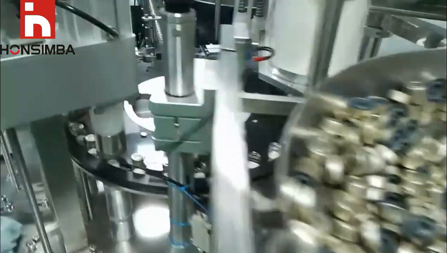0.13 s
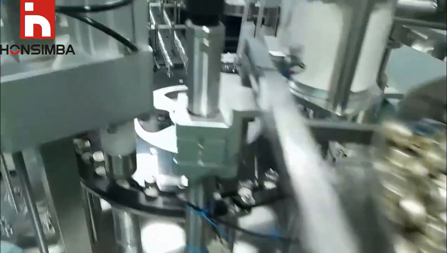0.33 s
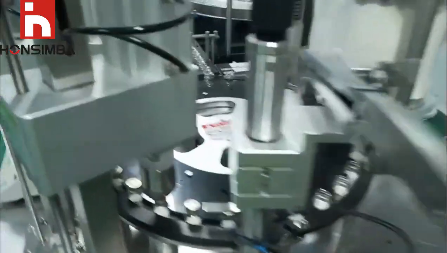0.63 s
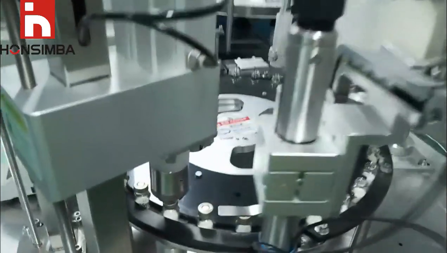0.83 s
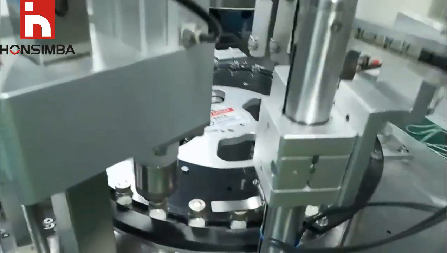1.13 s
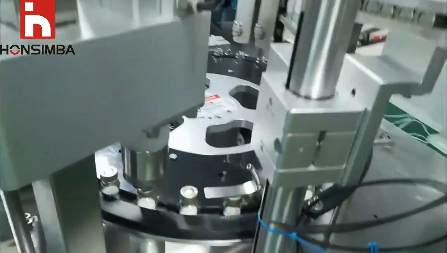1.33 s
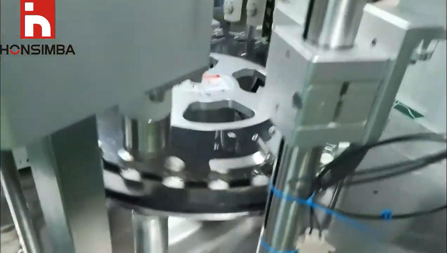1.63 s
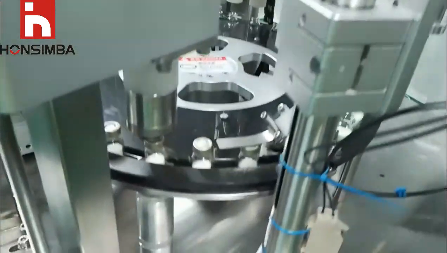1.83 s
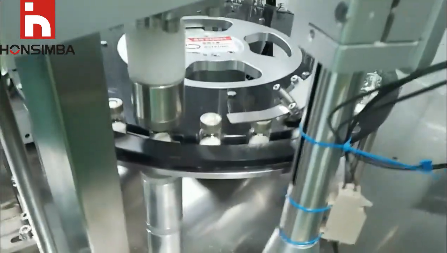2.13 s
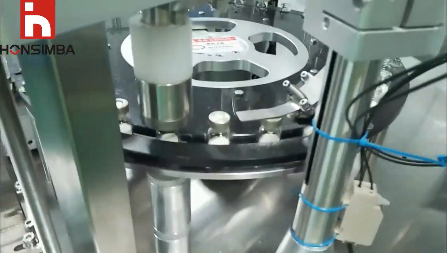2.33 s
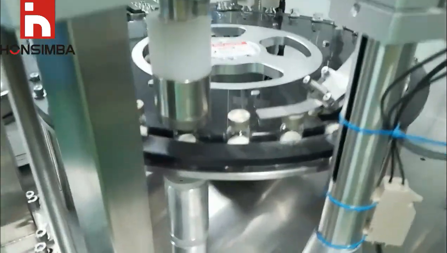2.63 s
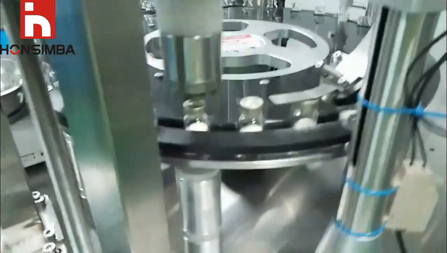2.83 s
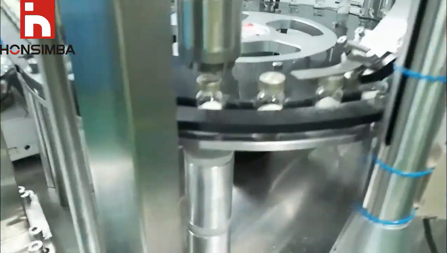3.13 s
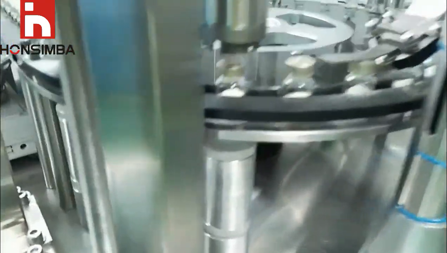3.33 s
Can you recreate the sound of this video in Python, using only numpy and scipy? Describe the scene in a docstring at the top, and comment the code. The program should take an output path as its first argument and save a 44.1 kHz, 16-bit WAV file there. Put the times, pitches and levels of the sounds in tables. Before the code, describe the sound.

Close up in a humming factory, a capping machine hisses air twice in long blasts, each followed by crisp puffs and ringing knocks on steel. Small parts clink while metal caps chatter steadily in a feeder bowl.

```python
"""A vial capping machine, close up and in mono, over factory ventilation and mains hum.
It opens on a blast of air, with metal caps chattering throughout in a vibrating feeder bowl.
Short puffs follow, the mechanism knocks the steel frame, and from 1.5 s small steel parts clink.
At 2.1 s the valve opens with a rush into a second long blast, and the chatter swells.
Spits, clinks, puffs and a run of ringing knocks close the cycle."""
import sys
import numpy as np
from scipy import signal
from scipy.fft import rfft, irfft
from scipy.io import wavfile
from scipy.ndimage import uniform_filter1d, map_coordinates

SR = 44100
rng = np.random.default_rng(int(sys.argv[2]) if len(sys.argv) > 2 else 0)


def materialize(psi):
    """Save the field psi as 16-bit PCM at rate SR to the path in sys.argv[1].

    A 1-D psi becomes a single channel; in a 2-D psi each row is a channel.
    """
    bounded = np.clip(np.atleast_2d(psi).T, -1, 1)
    quanta = np.round(bounded * 32767).astype(np.int16)
    wavfile.write(sys.argv[1], SR, quanta)


N = 154350

# Tone colours of the noise layers. Each row: frequency in Hz, relative level per Hz in dB.
HALL_EQ = [(25, -34), (55, -22), (80, -26), (125, -19), (165, -26), (195, -13), (235, -8.5), (285, 0),
           (340, -2.5), (500, -5.5), (660, -2), (900, -5.5), (1400, -3), (2000, -15.5), (3000, -38)]  # low ventilation wash
FEEDER_EQ = [(1200, -9.5), (1750, -3.5), (2400, -1), (3000, -3.5), (3500, -4), (4400, -4), (5400, -3.5),
             (6500, 3), (7400, 0), (8300, 4.5), (9300, -2), (10300, -7.5), (11500, -8), (13600, -9.5)]  # bright rattle of caps
CRACK_EQ = [(2000, -10), (4000, -2), (5500, 3.5), (8300, 10.5), (10000, -3.5), (14000, -7)]  # sharp edge of a clink
KNOCK_EQ = [(40, -23), (110, -6.5), (175, -18), (260, 3.5), (450, -1), (680, 6.5), (900, -4.5), (2500, -31),
            (6000, -12)]  # dull body of a knock
CLACK_EQ = [(700, 2), (1200, -6), (2500, 1), (5000, -15), (9000, -20)]  # hard top of a knock
PUFF_EQ = [(1500, -28), (2500, -19), (4500, 9), (6400, 14), (7400, 15), (8300, 17), (9300, 10.5),
           (10300, 12), (11200, -12), (14000, 1)]  # crisp puff of air
SPIT_EQ = [(1500, -16), (2400, 2), (5000, -14), (9000, -21), (10300, 0.5), (11500, 2), (13500, -7.5)]  # thin spit of air
RUSH_EQ = [(200, -16), (700, -5), (1100, -12), (2000, -1), (3800, 2), (6000, 1), (14000, -5.5)]  # broad rush of the opening valve
BLAST_EQ = [(1000, -19), (1700, -20.5), (2200, -10), (2950, -17), (3500, -9), (4400, -13), (5600, -6),
            (6300, -0.5), (6800, 1.5), (7500, -3), (8300, 2.5), (9000, -3), (10000, -8.5), (12500, -12.5),
            (13700, -9)]  # hissing jet

# Hum and whine of motors and vibrators. Each row: frequency in Hz, level in dB.
MOTOR_TONES = [(100, -66), (200, -69.5), (2553, -52), (6454, -58)]
# Fader curve of the cap chatter. Each row: time in seconds, level in dB.
FEEDER_FADER = [(0, -27.5), (.62, -26.5), (.72, -27), (.82, -25), (.9, -28), (1.08, -27), (1.28, -27.5),
                (1.43, -27.5), (1.58, -26), (1.78, -26.5), (1.86, -28), (2.0, -31), (2.15, -21.5),
                (2.95, -25.5), (3.08, -26.5), (3.18, -25.5), (3.34, -28.5), (3.5, -26.5)]

# Resonances of struck steel. Each row: frequency in Hz, relative level in dB, t60 in seconds.
SMALL_PART_MODES = [(4040, -8, 0.015), (5520, 3, 0.085), (6680, -6, 0.07), (8400, -7, 0.03)]
FRAME_LOW_MODES = [(199, -10, 0.22), (252.2, 3, 0.45), (280.6, 8, 0.36), (298, 8, 0.25), (327, 12, 0.07)]
FRAME_MID_MODES = [(356, 4, 0.19), (426.5, 7, 0.26), (454, 1, 0.46), (626, -2, 0.4)]
# Small parts touching. Each row: start in seconds, crack level in dB, ring level in dB.
CLINK_CUES = [(1.5047, -16.5, -27), (1.5808, -17, -22), (1.6408, -17, -27), (1.7385, -26, -27.5),
              (2.129, -14, -24), (2.5125, -17, -27), (2.555, -16, -29), (2.7435, -18, -30),
              (2.767, -20, -25), (3.1667, -29, -36)]
# Knocks on the frame. Each row: start in seconds, body level in dB, body decay in seconds,
# then the levels of the low ring, the mid ring and the clack in dB.
KNOCK_CUES = [(0.474, -34, 0.063, -31, -50, -49), (0.573, -41, 0.04, -29, -50, -45),
              (0.626, -43, 0.04, -35.5, -50, -35), (1.118, -32, 0.037, -36.5, -29.5, -24),
              (2.042, -37, 0.084, -34.5, -50, -39), (2.126, -35, 0.1, -41, -55, -38),
              (2.855, -27, 0.027, -31, -50, -45), (2.915, -39, .035, -35, -42, -54),
              (2.955, -38, 0.07, -30, -40, -47), (3.028, -40, 0.1, -35, -49, -31),
              (3.477, -35.5, .04, -50, -39, -31.5)]

# Releases of air. Each row: start, rise, hold and decay in seconds, then level in dB.
PUFF_CUES = [(0.362, 0.012, 0.024, 0.02, -23), (.398, .015, .008, 0.035, -23.5),
             (0.459, 0.014, 0.019, 0.019, -22), (0.563, 0.011, 0.011, 0.034, -25),
             (1.109, .012, .005, 0.0077, -20.5), (1.215, .005, .01, .008, -31),
             (1.499, 0.004, 0.002, .003, -25), (1.617, 0.0044, .005, .006, -25),
             (1.636, 0.0028, 0.004, 0.0061, -24), (2.039, .006, 0.055, 0.0095, -25),
             (2.688, 0.0054, 0.02, .008, -24), (2.755, 0.0079, 0.034, 0.0065, -20),
             (2.846, 0.012, 0.0066, 0.012, -17.5), (3.188, .014, .004, .01, -32),
             (3.478, .012, .01, .01, -25.5)]
SPIT_CUES = [(2.33, .02, 0.072, .015, -23), (2.788, .003, .013, .003, -19.5)]
BLAST_CUES = [(-.2, 0.04, .42, 0.069, -15.5), (2.128, .055, .45, .1, -16.5)]
# Echoes off nearby steel panels. Each entry: delay in seconds.
PANEL_ECHOES_S = [.0016, .0027, .0043, .0071]


def undb(db):
    """Decibels to gain."""
    return 10 ** (np.asarray(db) / 20)


def unit(x):
    """Scale to rms 1."""
    return x / np.sqrt(np.mean(x ** 2) + 1e-18)


def colour(x, points):
    """EQ a sound through (Hz, dB) points, rolling off below the lowest; rms 1."""
    hz, db = np.array(sorted(points)).T
    f = np.maximum(np.arange(N // 2 + 1) * SR / N, 1)
    gain = undb(np.interp(np.log(f), np.log(hz), db)) * np.minimum(f / hz[0], 1) ** 2
    return unit(irfft(rfft(x) * gain, N))


def noise(points):
    """Noise with a given tone colour."""
    return colour(rng.standard_normal(N), points)


def drift(rate_hz):
    """Smooth random movement, mostly slower than rate_hz; rms 1."""
    f = np.arange(N // 2 + 1) * SR / N
    return unit(irfft(rfft(rng.standard_normal(N)) * (f > 0) / (1 + (f / rate_hz) ** 2), N))


def flicker(x, depth_db, rate_hz, low_hz, octaves, count):
    """Let neighbouring bands of a sound waver in level, each on its own; rms 1."""
    f = np.maximum(np.arange(N // 2 + 1) * SR / N, 1)
    spectrum = rfft(x)
    place = (count - 1) * np.clip(np.log2(f / low_hz) / octaves, 0, 1)
    bands = (irfft(spectrum * np.maximum(1 - abs(place - k), 0), N) for k in range(count))
    return unit(sum(band * undb(depth_db * drift(rate_hz)) for band in bands))


def envelope(start, rise, hold, decay):
    """Linear rise, hold, exponential decay, all in seconds."""
    t = np.arange(N) / SR - start
    return np.clip(t / max(rise, 1 / SR), 0, 1) * np.exp(-np.maximum(t - rise - hold, 0) / decay)


def ring(start, modes):
    """Struck steel rings in decaying modes, slightly detuned on every hit; rms 1 at the start."""
    out, first = np.zeros(N), int(start * SR)
    t = np.arange(min(SR // 2, N - first)) / SR
    for hz, db, t60 in modes:
        cycles = hz * t * (1 + 0.01 * rng.standard_normal()) + rng.random()
        fade = np.exp(-np.log(1000) * t / t60)
        out[first:first + len(t)] += undb(db) * np.sin(2 * np.pi * cycles) * fade
    return out / np.sqrt(sum(undb(db) ** 2 for _, db, _ in modes) / 2)


def hall(wash_db=-38.5):
    """The bed: a wandering wash of ventilation and other machines, with motor and vibrator tones."""
    t = np.arange(N) / SR
    wash = flicker(noise(HALL_EQ), depth_db=1.9, rate_hz=6.5, low_hz=100.3, octaves=4.16, count=9)
    tones = np.zeros(N)
    for hz, db in MOTOR_TONES:
        wavering_gain = np.sqrt(2) * undb(db + 2 * drift(3))
        tones += wavering_gain * np.sin(2 * np.pi * hz * t + .5 * drift(3))
    return undb(wash_db) * wash + tones


def cap_rings(hits, count=3, decay_s=0.0097):
    """Different caps take turns to be struck, each with its own short ring."""
    fade = np.exp(-np.arange(SR // 10) / SR / decay_s)
    turn = np.argmax([drift(3) for _ in range(count)], axis=0)
    caps = [rng.standard_normal(len(fade)) * fade for _ in range(count)]
    return unit(sum(signal.fftconvolve(hits * (turn == k), cap)[:N] for k, cap in enumerate(caps)))


def feeder(mains_hz=50, hits_per_s=2500, surge_db=1.03):
    """Caps hop in time with the shaking bowl: dense tiny ticks and short rings over a hiss."""
    t = np.arange(N) / SR
    shake = 1 + .15 * np.sin(2 * np.pi * mains_hz * t)
    ticks = (rng.random(N) < hits_per_s * shake / SR) * rng.choice([-1, 1], N)
    accent_db = np.minimum(rng.exponential(size=N), 4)
    hits = ticks * undb(accent_db)
    chatter = 0.62 * unit(hits) + 0.97 * cap_rings(hits)
    hiss = .5 * rng.standard_normal(N)
    bowl = colour(chatter + hiss, FEEDER_EQ)
    bowl = flicker(bowl, depth_db=1.5, rate_hz=15, low_hz=1755, octaves=2.97, count=15)
    fader_db = np.interp(t, *np.array(FEEDER_FADER).T)
    return bowl * undb(fader_db + surge_db * drift(16.5))


def clinks():
    """Steel touches steel: a bright crack and a short ring."""
    crack, out = noise(CRACK_EQ), np.zeros(N)
    for start, crack_db, ring_db in CLINK_CUES:
        out += undb(crack_db) * envelope(start, rise=.0012, hold=.0022, decay=.002) * crack
        out += undb(ring_db) * ring(start, SMALL_PART_MODES)
    return out


def frame_knocks(attack_s=0.0059, clack_decay_s=0.0094):
    """Each knock has a dull body with a hard clack on top, and leaves the frame ringing."""
    body, clack, out = noise(KNOCK_EQ), noise(CLACK_EQ), np.zeros(N)
    for start, body_db, decay, low_db, mid_db, clack_db in KNOCK_CUES:
        rings = undb(low_db) * ring(start, FRAME_LOW_MODES) + undb(mid_db) * ring(start, FRAME_MID_MODES)
        out += undb(body_db) * envelope(start, attack_s, 0, decay) * body
        out += envelope(start, attack_s, 1, 1) * rings  # softens only the attack
        out += undb(clack_db) * envelope(start, attack_s, 0, clack_decay_s) * clack
    return out


def panels(x, echo_gain=0.71, sway_s=0.0001223, sway_hz=2.09):
    """Steel panels mirror the sound; their delays sway as the hand-held microphone moves."""
    t = np.arange(N) / SR
    echoes = np.zeros(N)
    for delay in PANEL_ECHOES_S:
        sway = sway_s * uniform_filter1d(drift(sway_hz), size=4000)
        echoes += map_coordinates(x, [(t - delay - sway) * SR], order=3, mode="mirror")
    return (x + echo_gain * echoes) / np.sqrt(1 + len(PANEL_ECHOES_S) * echo_gain ** 2)


def airflow(cues):
    """Gain curve of a series of air releases, each swelling, holding and dying away."""
    return sum(undb(db) * envelope(start, rise, hold, decay) for start, rise, hold, decay, db in cues)


def air_blasts(sputters_per_s=21, sputter_decay_s=0.0026, flutter_db=.4):
    """The valve lets out long jets of hiss that flutter and sputter."""
    jet = flicker(noise(BLAST_EQ), depth_db=1.8, rate_hz=12, low_hz=1835, octaves=3.055, count=18)
    kicks = 1. * (rng.random(N) < sputters_per_s / SR)
    sputter = signal.lfilter([1], [1, -np.exp(-1 / (sputter_decay_s * SR))], kicks)
    return undb(flutter_db * drift(11)) * (1 + 0.35 * sputter) * airflow(BLAST_CUES) * jet


def air(valve_opens_s=2.127, rush_db=-17.5):
    """The lead layer: long blasts, the broad rush of the valve opening, short puffs and bright spits."""
    blasts = air_blasts()
    rush = undb(rush_db) * envelope(valve_opens_s, rise=.001, hold=0.015, decay=0.036) * noise(RUSH_EQ)
    puffs = airflow(PUFF_CUES) * noise(PUFF_EQ)
    spits = airflow(SPIT_CUES) * noise(SPIT_EQ)
    return blasts + rush + puffs + spits


def scene():
    """Mix the machine and the hall, alike in both channels; only the air echoes off the panels."""
    mix = panels(air()) + feeder() + frame_knocks() + clinks() + hall()
    return np.tile(mix, (2, 1))


def record(dry, peak_limit=0.51, top_hz=14000):
    """Round off the highest peaks and cut the top end."""
    rounded = dry / (1 + (dry / peak_limit) ** 4) ** .25
    return signal.sosfilt(signal.ellip(12, .1, 85, top_hz, fs=SR, output="sos"), rounded)


dry = scene()
out = record(dry)
materialize(out)
```